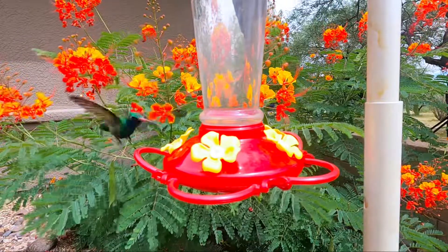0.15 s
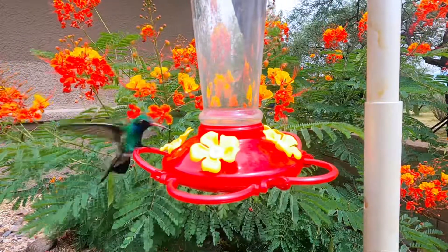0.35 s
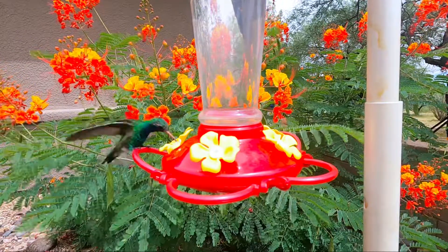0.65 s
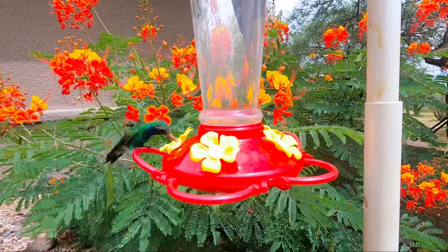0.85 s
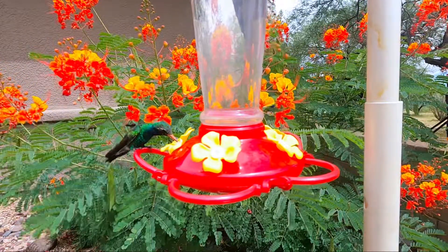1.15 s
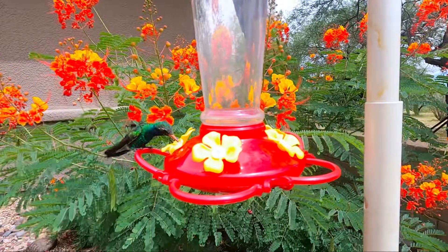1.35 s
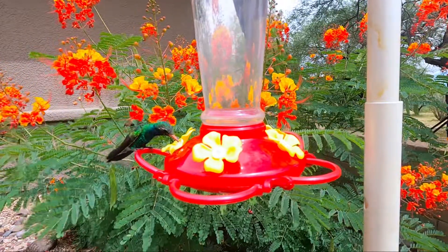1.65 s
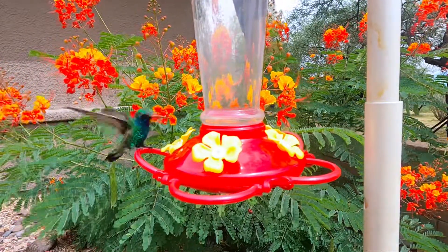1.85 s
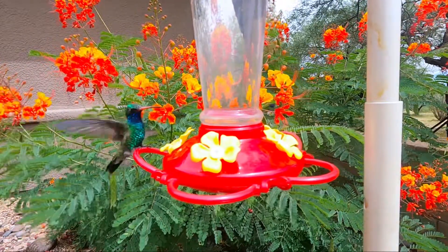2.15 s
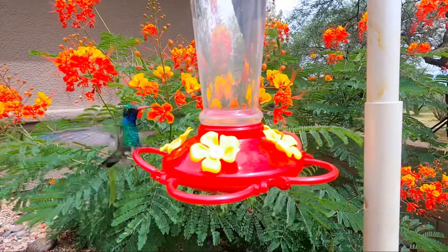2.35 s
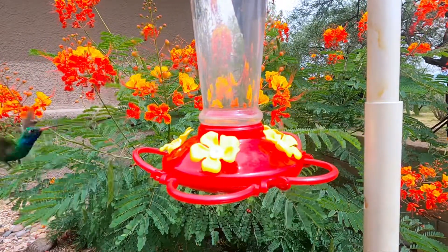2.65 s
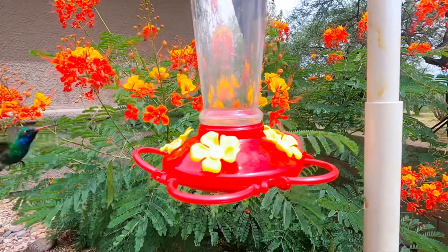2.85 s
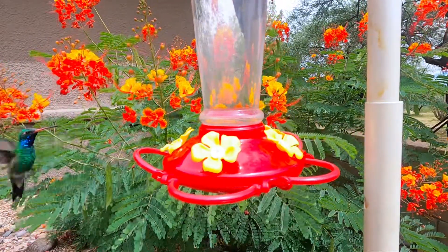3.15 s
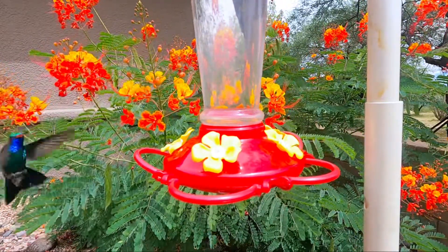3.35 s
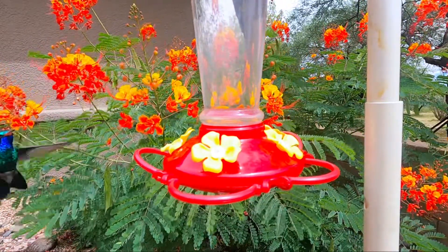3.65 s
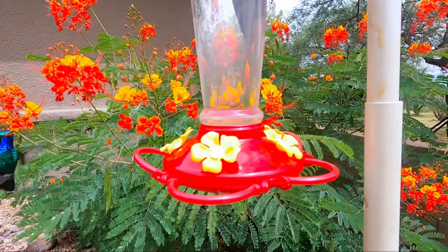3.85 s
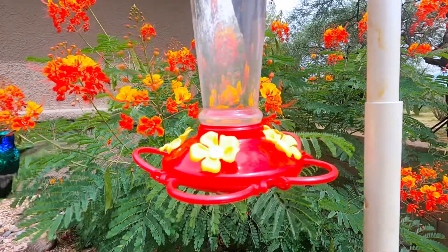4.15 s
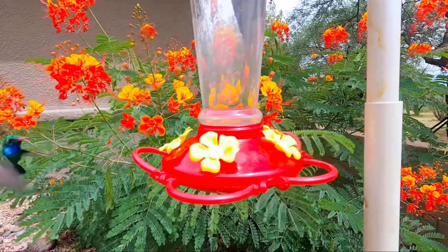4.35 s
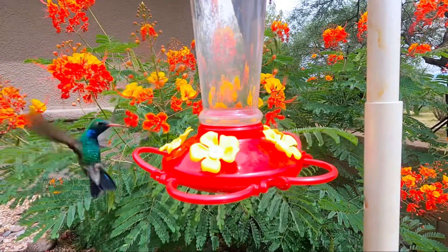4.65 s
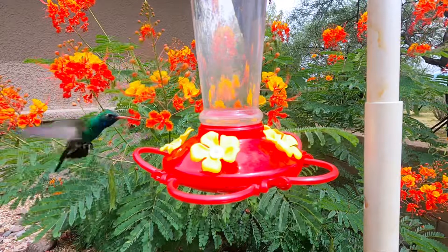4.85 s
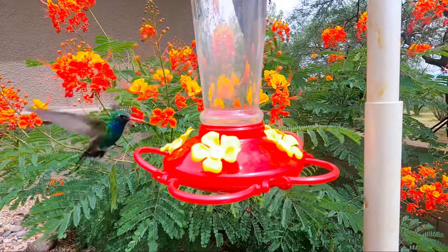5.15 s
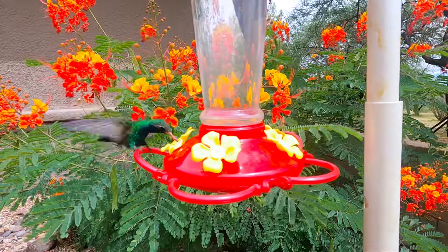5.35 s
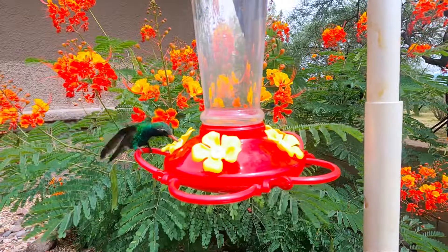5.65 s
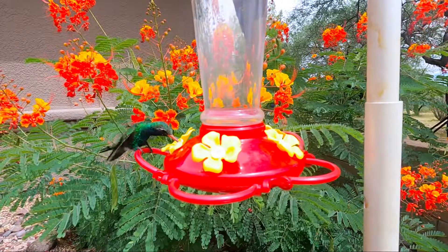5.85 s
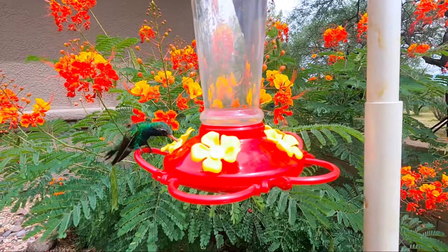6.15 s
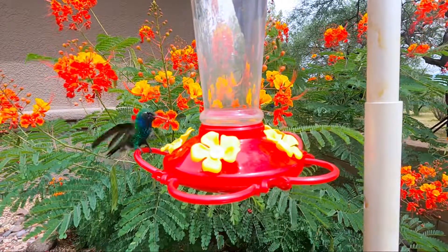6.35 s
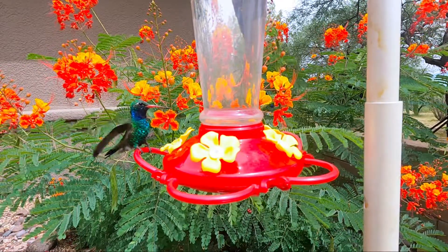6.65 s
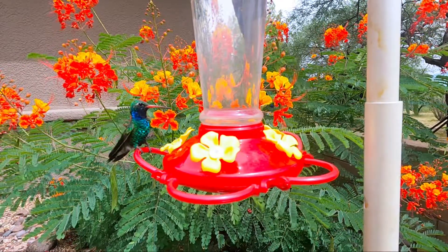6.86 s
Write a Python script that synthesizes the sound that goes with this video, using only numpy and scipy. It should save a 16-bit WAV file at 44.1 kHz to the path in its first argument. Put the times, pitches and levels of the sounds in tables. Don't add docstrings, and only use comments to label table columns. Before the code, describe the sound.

Low, puffing wingbeats, roughly sixteen a second, pulse against a nearby microphone outdoors. Two bright chips cut through the first brief flight; a perched lull leaves soft garden hiss, a faint distant motor and wind bumps. Plastic ticks and a rustle announce a second, longer flight with another chip and later three more, each with a light wall echo. The fluttering then ceases into quiet air.

```python
import sys
import numpy as np
from scipy import signal
from scipy.fft import rfft, irfft, next_fast_len
from scipy.io import wavfile
from scipy.ndimage import uniform_filter1d

SR = 44100
rng = np.random.default_rng(int(sys.argv[2]) if len(sys.argv) > 2 else 0)


def store_wav(level_fs):
    pcm = np.round(np.clip(np.atleast_2d(level_fs), -1, 1) * 32767)
    wavfile.write(sys.argv[1], SR, pcm.T.astype(np.int16))


def how_loud(loudness_db):
    steps = np.asarray(loudness_db, float) / 20
    return 10 ** steps


N = 309126


# [f/Hz, level/dB per Hz]
GARDEN_SPECTRUM = [(50, -7.5), (76, 2), (169, -6), (255, -10.5), (427, -14), (644, -11.5), (843, -19),
                   (1330, -25.5), (1810, -31.5), (2620, -26), (3900, -29.5), (4600, -39.5), (6900, -49.5),
                   (8970, -86.5)]
# [f/Hz, correlation]
GARDEN_LIKENESS = [(60, 0.84), (150, 0.5), (390, 0.53), (990, 0.47), (2530, 0.76), (6450, 0.55)]
# [f/Hz, level difference/dB]
GARDEN_LEAN = [(60, -7.5), (130, -5), (290, -1.5), (620, 1), (1360, 1.0), (2960, 1.0), (6450, 6.5)]
# [t/s of peak, level/dB, time/s to fall 20 dB]
LEAF_STIRS = [
    (.4, -70.5, 0.36),
    (2.5, -72.5, 0.26),
    (2.81, -61.5, 0.37),
    (3.8, -78.5, 1.5),
    (4.87, -69, 1.65),
    (5.4, -72, -0.16),
]
# [t/s of peak, level/dB, time/s to fall 20 dB]
RUSTLES = [(0.001, -65.5, 0.34), (.332, -64.5, 0.12), (.6, -75.5, -0.26), (.728, -81, -0.9),
           (.794, -75, -0.76), (1.906, -62, 0.17), (1.996, -61.5, 0.5), (2.618, -90, 2), (2.67, -59, 0.42),
           (4.594, -64.5, -0.1), (4.65, -68, -0.1), (5.848, -71, 0.23), (6.6, -70.5, 0.4),
           (6.644, -75.5, 0.7)]
# [f/Hz, level/dB per Hz]
RUSTLE_SPECTRUM = [(240, -42), (400, -17), (478, 0.5), (545, -8.5), (607, 0), (943, -12.5), (3540, -15),
                   (6120, -30.5), (6900, -38.5), (8970, -61), (15200, -120)]
# [t/s, peak level/dB, f/Hz, left-right level/dB]
PERCH_TICKS = [(0.276, -51, 950, 2), (0.3277, -56.5, 930, 1.5), (0.6595, -68.5, 920, 7),
               (0.7294, -67.5, 975, 3.5), (0.7949, -76, 1088, 11), (1.8823, -67, 3030, -1.5),
               (1.9024, -56, 1000, 6), (1.9844, -54, 902, 9), (2.0014, -51, 1050, -11),
               (2.615, -55.5, 3300, 7), (2.645, -49.5, 935, 5), (2.6671, -44.5, 2330, 4.5),
               (2.6885, -48, 2300, 7), (2.71, -44, 1070, -1.5), (2.7407, -55, 996, 7),
               (2.7675, -47.5, 2770, 1), (2.925, -55, 3760, 4), (3.1647, -58.5, 3730, 7),
               (4.5345, -59, 950, 1), (4.5938, -51, 1990, 4)]
# [t/s, beats so far]
ARRIVE_BEATS = [
    (.023, 0),
    (.211, 3),
    (.278, 4),
    (.382, 6),
    (.571, 9),
    (.643, 10),
]
# [t/s, beats so far]
HOVER_BEATS = [(2.635, 0), (2.683, 1), (2.854, 4), (3.011, 7), (3.139, 9), (3.444, 14), (3.62, 17),
               (4.113, 25), (4.369, 29), (4.574, 32), (4.808, 36), (4.855, 37), (4.909, 38), (4.968, 39),
               (5.105, 41), (5.22, 43), (5.458, 47), (5.654, 50)]
# [t/s, downstroke level/dB, upstroke level/dB]
ARRIVE_STROKES = [
    (0.025, -31, -44),
    (.211, -30, -37),
    (.278, -29, -32),
    (.446, -33.5, -50),
    (0.574, -25, -40),
    (.644, -50.5, -47.5),
]
# [t/s, downstroke level/dB, upstroke level/dB]
HOVER_STROKES = [(2.635, -28.5, -34), (2.683, -22, -32), (2.737, -30.5, -38.5), (2.853, -28, -29.5),
                 (2.961, -34, -38.5), (3.011, -43.5, -53.5), (3.56, -36.5, -48), (3.62, -33, -38.5),
                 (4.4, -38, -45), (4.611, -29, -29), (4.69, -29.5, -41), (4.808, -38.5, -54),
                 (4.855, -22, -35), (4.908, -21, -48), (5.105, -41.5, -46), (5.28, -31.5, -39),
                 (5.44, -39, -42), (5.57, -35.5, -55.5)]
SOFT_DIP_MS = {"arrive": 5.82, "hover": 4.83}
# [t/s, level/dB]
SOFT_SWISH = [
    (0, -75),
    (.6, -72),
    (2.7, -74.5),
    (3.2, -66.5),
    (3.8, -73.5),
    (4.4, -73),
    (5.1, -68.5),
    (5.45, -66.5),
    (5.7, -77.5),
]
# [f/Hz, level/dB]
SWISH_SPECTRUM = [(600, -26), (1200, -7), (2000, -5), (3000, 2), (4200, -0.5), (5500, -5.5), (7000, -15.5)]
# [t/s of first full warble top, lead-in/ms, length/ms, level/dB, brightness/dB]
CHIP_CALLS = [
    (0.3853, 7.4, 47, -18, 2),
    (.462, 3.5, 34.4, -17.5, 3.5),
    (2.81, 3.5, 38.4, -21.5, 0),
    (4.686, 10, 47.7, -20, -3.5),
    (4.752, 4, 35.5, -18, 5.5),
    (4.847, 3.6, 33.4, -20.5, 4),
]
CHIP_OVERTONES = [-0.5, -4, -7, -20.5]
# [f/Hz, level/dB]
BEAK_SPECTRUM = [(500, -15), (900, -10.5), (1300, -10.5), (1800, -9), (2300, -2.5), (2900, 0), (3600, 1),
                 (4500, -10.5), (6000, -19), (7000, -25.5), (8500, -32)]
# [f/Hz, t60/s]
WALL_DECAY = [(800, 0.39), (2000, .34), (2600, 0.31), (3100, 0.48), (3600, .33), (4500, .32), (7000, 0.32)]
# [t/s of peak, level/dB, time/s to fall 20 dB]
GUSTS = [(.64, -46.5, 1.84), (1.18, -55, 0.14), (1.63, -57.5, 0.088), (1.75, -46, 0.48),
         (2.04, -42.5, 0.28), (2.174, -34.5, 0.027), (2.5, -52, 0.38), (5.42, -35.5, 0.13),
         (5.6, -52, 0.15), (5.82, -56.5, 0.18), (6.36, -50.5, 0.48), (6.674, -49, 0.23), (6.93, -49, 0.19)]
# [t/s of peak, level/dB, time/s to fall 20 dB]
MOTOR_SWELLS = [
    (1.2, -63, 0.93),
    (2.1, -67, -0.67),
]

GARDEN_DB = -65
STIR_RISE, RUSTLE_RISE, GUST_RISE, MOTOR_RISE = 0.9, .33, 0.63, 0.55
UP_PLACE = .53
SOFT_DB = -42
DIP_MS_PER_DB = .03
SWISH_PER_DB = 0.2542
CHIP_PAN_DB = 3.1


def evened(x):
    return x / np.sqrt(np.mean(x ** 2) + 1e-20)


def read(points, hz):
    f, value = np.transpose(points)
    return np.interp(np.log(hz + 1), np.log(f + 1), value)


def sides(pan_db):
    return how_loud(np.array([[pan_db / 2], [-pan_db / 2]]))


def add(mix, s, sound):
    part = mix[..., max(round(s * SR), 0):][..., :sound.shape[-1]]
    part += sound[..., :part.shape[-1]]


def coloured(x, points):
    size = next_fast_len(x.shape[-1] + 2048)
    gain = how_loud(read(points, np.fft.rfftfreq(size, 1 / SR)))
    return irfft(rfft(x, size) * gain, size)[..., :x.shape[-1]]


def hiss(points, same):
    a, b = rng.standard_normal((2, N))
    right = same * a + np.sqrt(1 - min(same, 1) ** 2) * b
    return evened(coloured(np.array([a, right]), points))


def swells(rows, rise):
    t = np.arange(N) / SR
    gain = sum(how_loud(db - 20 * np.maximum((t - s) / fall, (s - t) / (rise * fall))) for s, db, fall in rows)
    return uniform_filter1d(gain, size=400)


def bump(t, width):
    return np.exp(-.5 * (t / width) ** 2)


def garden():
    frames, hz = N // 256 + 5, np.fft.rfftfreq(1024, 1 / SR)
    a, b, c, d, patches = rng.standard_normal((frames, 513, 5)).T
    patches = uniform_filter1d(patches, size=10, axis=0)
    patches = evened(uniform_filter1d(patches, size=16, axis=1))
    same = np.clip(read(GARDEN_LIKENESS, hz), -1, 1)[:, None]
    left = a + 1j * b
    right = same * left + np.sqrt(1 - same ** 2) * (c + 1j * d)
    lean_db = np.array([.5, -.5])[:, None, None] * read(GARDEN_LEAN, hz)[:, None]
    spectra = np.array([left, right])
    spectra *= how_loud(read(GARDEN_SPECTRUM, hz)[:, None] + lean_db + 1.2 * patches)
    noise = evened(signal.istft(spectra, nperseg=1024, noverlap=768)[1][:, :N])
    return how_loud(5.0) * (how_loud(GARDEN_DB) + swells(LEAF_STIRS, STIR_RISE)) * noise


def perch():
    ticks, t = np.zeros((2, N)), np.arange(600) / SR
    puffs = rng.standard_normal((len(PERCH_TICKS), 600))
    for (s, db, hz, pan_db), puff in zip(PERCH_TICKS, puffs):
        scrape = evened(coloured(puff, [(hz / 4.5, -14), (hz, 0.), (hz * 1.9, -6), (8000, -23)]))
        ring = .5 * np.sin(2 * np.pi * hz * t) + .7 * scrape
        add(ticks, s, how_loud(db - 60 * t / .014) * ring * sides(pan_db))
    grain = how_loud(2.5 * evened(uniform_filter1d(rng.standard_normal(N), size=150)))
    return ticks + swells(RUSTLES, RUSTLE_RISE) * evened(grain * hiss(RUSTLE_SPECTRUM, 0.72))


def dip(t, width, db):
    hard = np.clip((db + 42.5) / 18, 0, 1)
    drop = 0.44 * bump(t, 0.76 * width) - 1.19 * bump(t, 0.72 * width)
    drop -= 0.33 * hard * bump(t, 0.26 * width)
    after = .55 * bump(t - 1.65 * width, .6 * width) - .25 * bump(t - 3.1 * width, .7 * width)
    before = .35 * bump(t + 1.9 * width, .7 * width)
    return drop + hard * (after + before)


def flight(beats, strokes, dip_ms):
    s, count = np.transpose(beats)
    count = np.r_[-1, count, count[-1] + 1]
    s = np.r_[s[0] - .06, s, s[-1] + .06]
    starts = np.interp(np.arange(-1, count[-1] + 1), count, s)
    times, down_levels, up_levels = np.transpose(strokes)
    thump, swish = np.zeros((2, N + SR))
    t = np.arange(-2000, 4000) / SR
    chance = rng.standard_normal((len(starts), 4))
    for start, length, (a, b, c, d) in zip(starts[1:], np.diff(starts)[1:], chance):
        down_db = np.interp(start, times, down_levels)
        up_db = np.interp(start, times, up_levels)
        effort_db = down_db - SOFT_DB
        width = (dip_ms + DIP_MS_PER_DB * effort_db) / 1000
        swish_db = np.interp(start, *np.transpose(SOFT_SWISH)) + SWISH_PER_DB * effort_db
        down = how_loud(down_db + 1.5 * a) * dip(t, width, down_db)
        back = how_loud(up_db + 1.3 * b) * dip(t - UP_PLACE * length, 0.92 * width, up_db)
        wake = 0.48 * bump(t - 0.3 * length, 0.4 * length) - 0.45 * bump(t - 0.16 * length, 0.0032)
        add(thump, start, down + back + how_loud(0.36 * down_db - 19.0) * wake)
        turns = how_loud(1.2 * c - 3) * bump(t + .04 * length, .003)
        turns += how_loud(1.2 * d) * bump(t - .54 * length, .0025)
        between = how_loud(swish_db - 11.5) * bump(t - 0.33 * length, 0.018)
        add(swish, start, how_loud(swish_db) * turns + between)
    return thump[2000:N + 2000], swish[2000:N + 2000]


def wings():
    arrive = flight(ARRIVE_BEATS, ARRIVE_STROKES, SOFT_DIP_MS["arrive"])
    hover = flight(HOVER_BEATS, HOVER_STROKES, SOFT_DIP_MS["hover"])
    thump, swish = np.add(arrive, hover)
    thump = coloured(thump, [(6, -23), (14, 0.0), (300, 7.0)])
    return thump * sides(-0.85) + swish * hiss(SWISH_SPECTRUM, 0.5) * sides(3.5)


def chip(lead_ms, length_ms, db, bright_db):
    t = np.arange(round(length_ms / 1000 * SR)) / SR - lead_ms / 1000
    u = np.linspace(0, 1, len(t))
    swing = 2 * np.pi * (149 * t - 455 * t * abs(t))
    low_hz, high_hz = 1420 - 14000 * t, 3250 - 7000 * t
    hz = low_hz + (high_hz - low_hz) * (.5 + .5 * np.cos(swing)) ** .8
    hz *= 1 + 0.019 * evened(uniform_filter1d(rng.standard_normal(len(t)), size=60))
    hz *= 1 - .5 * np.exp(-u / 0.032) - 0.65 * np.exp((u - 1) / 0.05)
    turns = np.cumsum(hz) / SR
    pressed_db = -7 * np.exp(-u / 0.46) - 5 * np.exp((u - 1) / .12) + 3 * np.sin(swing - .4)
    tone = np.zeros(len(t))
    for k, level_db in enumerate(CHIP_OVERTONES):
        wave = np.cos(2 * np.pi * (k + 1) * turns + .6 * k ** 2)
        tone += how_loud(level_db + min(k, 1) * pressed_db) * wave
    breath = how_loud(-14.0) * rng.standard_normal(len(t))
    swell = (.3 + 0.62 * np.sin(np.pi * u ** 1.1)) * signal.windows.tukey(len(t), .1)
    swell *= np.clip(1 + t / 0.0087, .17, 1)
    swell *= how_loud(0.32 * np.cos(swing))
    voice = coloured((tone + breath) * swell, BEAK_SPECTRUM)
    return how_loud(db) * coloured(voice, [(3600, 0.), (5200, bright_db)])


def wall(x):
    taps = np.zeros((2, SR // 2))
    at = np.arange(300, SR // 2 - 20, 20) + rng.integers(0, 20, (2, (SR // 2 - 301) // 20))
    np.put_along_axis(taps, at, rng.choice([-1., 1.], at.shape), 1)
    hz, t, z = signal.stft(taps, SR, nperseg=256)
    tail = signal.istft(z * how_loud(-60 * t / read(WALL_DECAY, hz)[:, None]), SR, nperseg=256)[1]
    tail = coloured(tail, [(2300, 0.5), (3050, -1.0), (4000, -1.0)])
    tail *= how_loud(-24.0) / np.linalg.norm(tail[0])
    for side, ms, db in [(0, 1.9, -20.5), (1, 2.6, -20.5), (0, 8.1, -20.5), (0, 5.3, -22)]:
        tail[side, round(ms * SR / 1000)] += how_loud(db)
    return signal.fftconvolve(x[None], tail, axes=1)[:, :N]


def calls():
    direct = np.zeros((2, N))
    for s, lead_ms, length_ms, db, bright_db in CHIP_CALLS:
        sound = chip(lead_ms, length_ms, db, bright_db)
        add(direct, s - lead_ms / 1000, sound * sides(CHIP_PAN_DB))
    return direct + wall(direct.mean(0))


def wind():
    lumps = hiss([(8, -17.5), (18, 4.5), (35, -8.5), (60, -18), (120, -31.0), (300, -76.5)], .8)
    return swells(GUSTS, GUST_RISE) * lumps


def drone():
    note = hiss([(100, -26.0), (170, -2.5), (215, 12.0), (250, -7), (330, -43.0)], 0.27)
    return swells(MOTOR_SWELLS, MOTOR_RISE) * note


def scene():
    return garden() + perch() + wings() + calls() + wind() + drone()


def band_limit(x):
    return signal.sosfilt(signal.butter(12, 15850, fs=SR, output="sos"), x)


def record(dry):
    heard = coloured(dry, [(6500, 0.5), (7500, -9.5), (8400, -17.0), (9000, -57.5), (10000, -86.5)])
    treble = coloured(heard.mean(0), [(700, -60.0), (1500, 14.0)])
    loudness = np.sqrt(abs(uniform_filter1d(treble ** 2, size=130)))
    spill = hiss([(13000, -58.0), (14200, -21.0), (15300, -1.0), (15750, -4.5), (16000, -59.5)], .6)
    heard = heard + how_loud(-49) * loudness ** 2.1 * spill * sides(2.5)
    return band_limit(heard)


dry = scene()
out = record(dry)
store_wav(out)
```